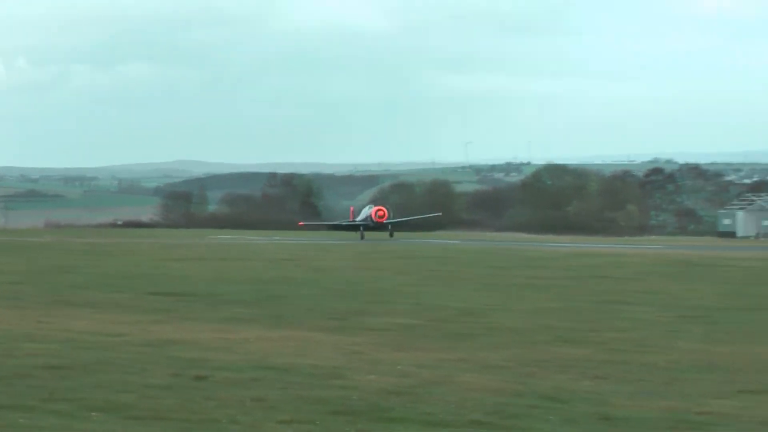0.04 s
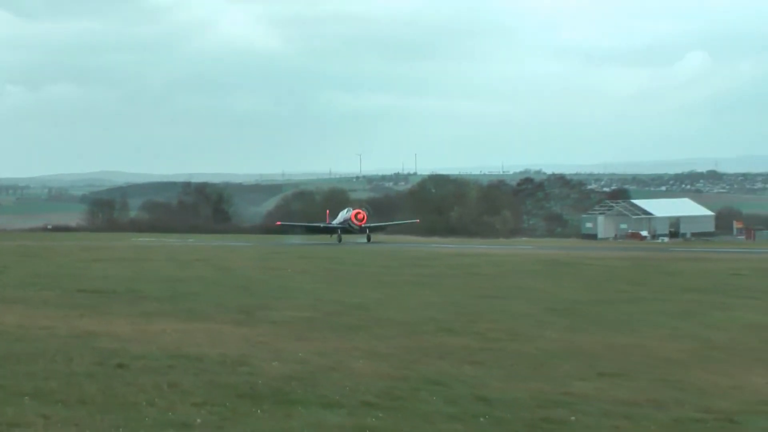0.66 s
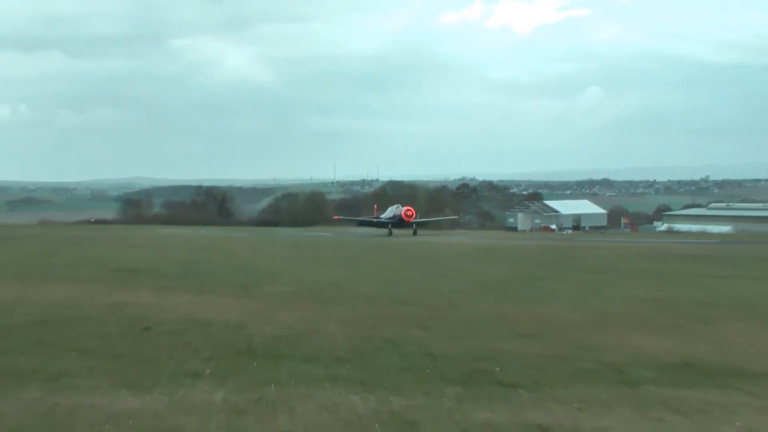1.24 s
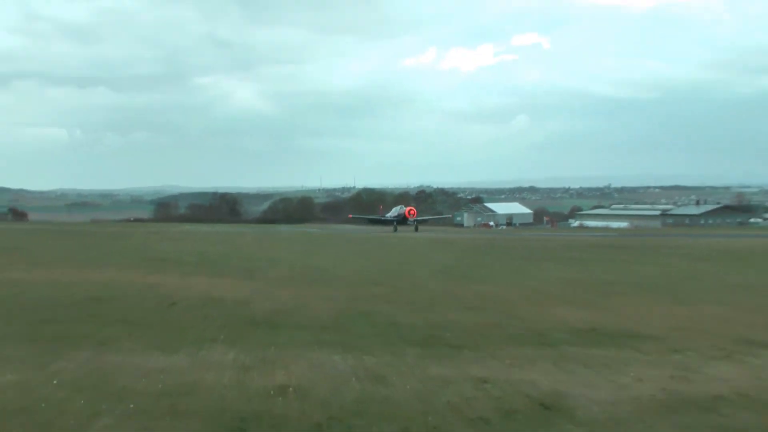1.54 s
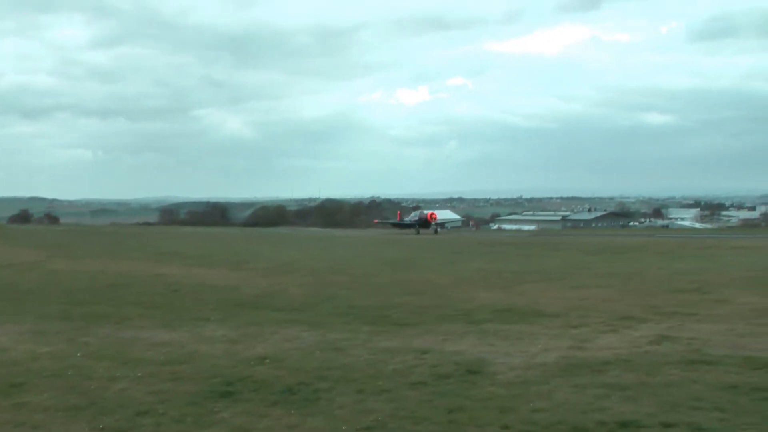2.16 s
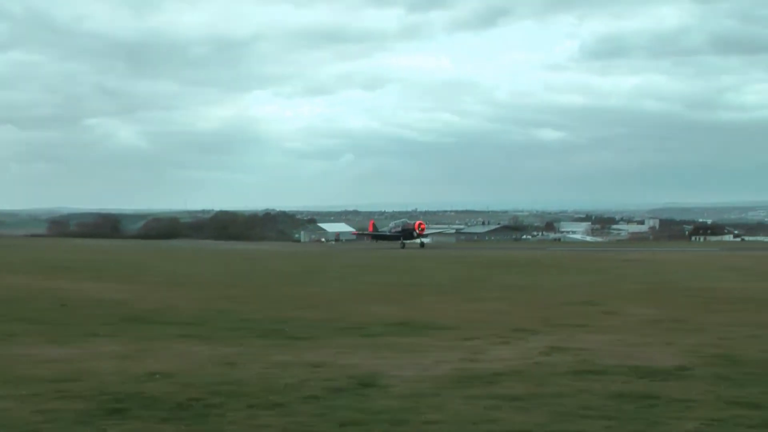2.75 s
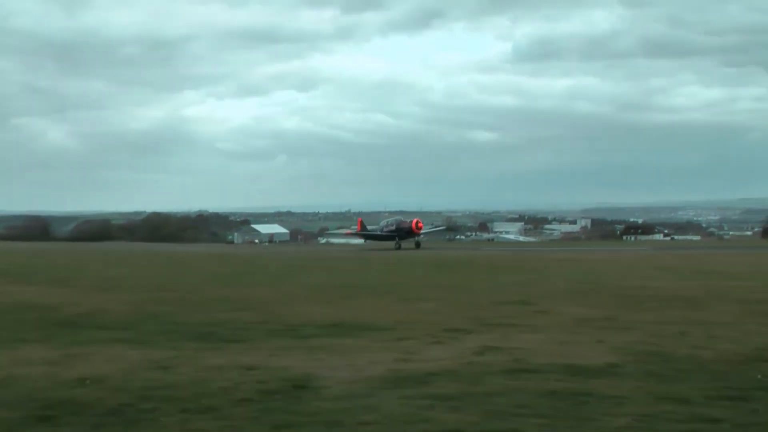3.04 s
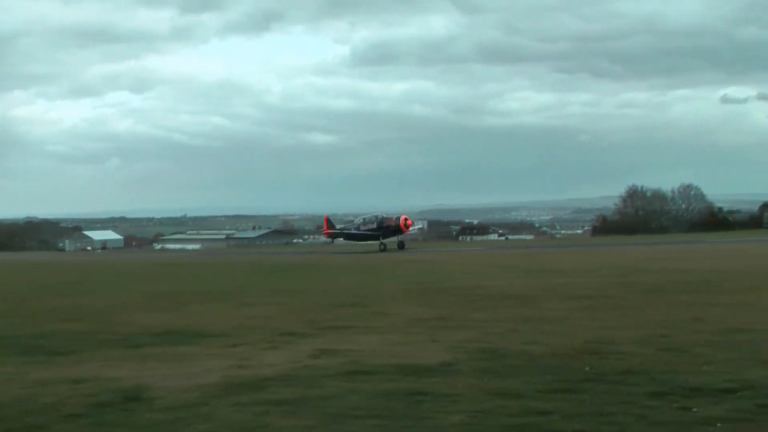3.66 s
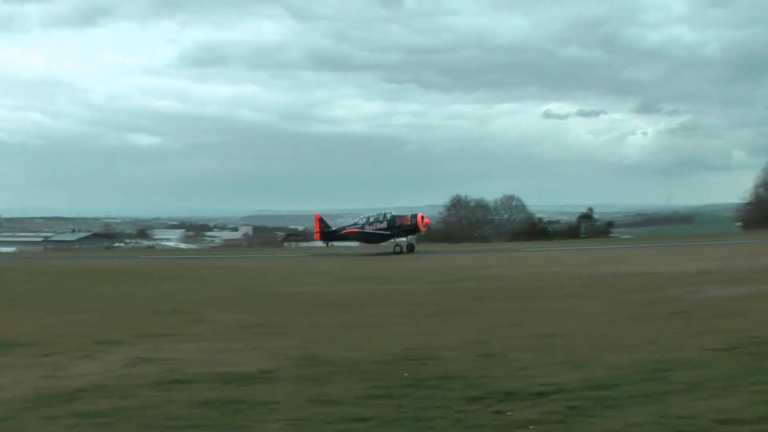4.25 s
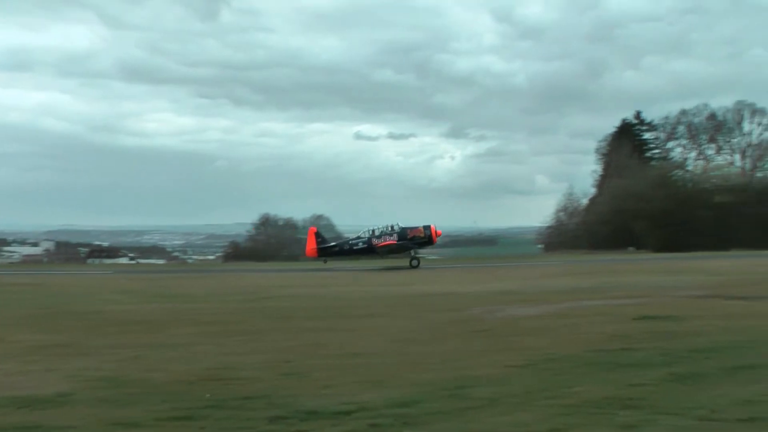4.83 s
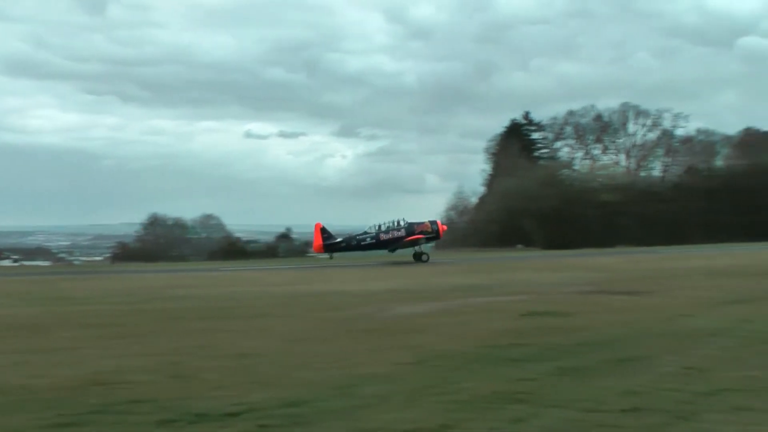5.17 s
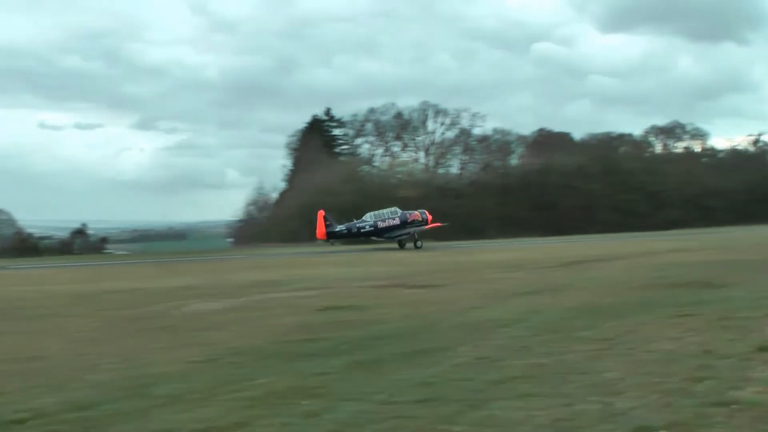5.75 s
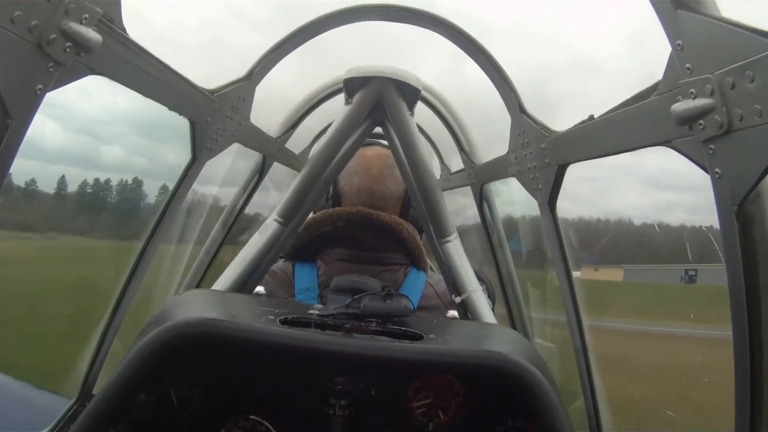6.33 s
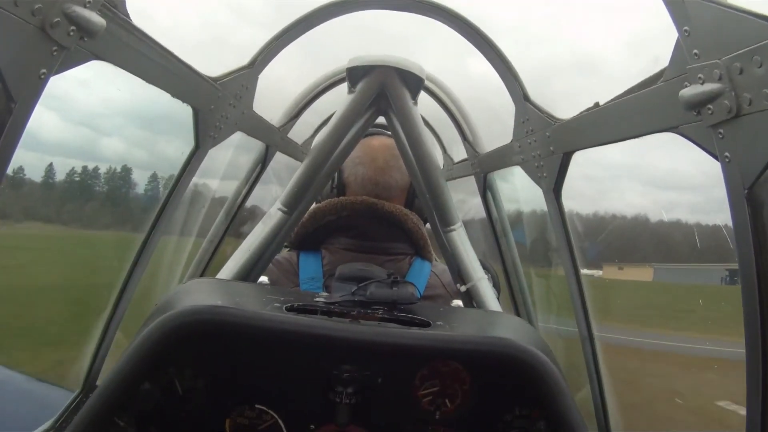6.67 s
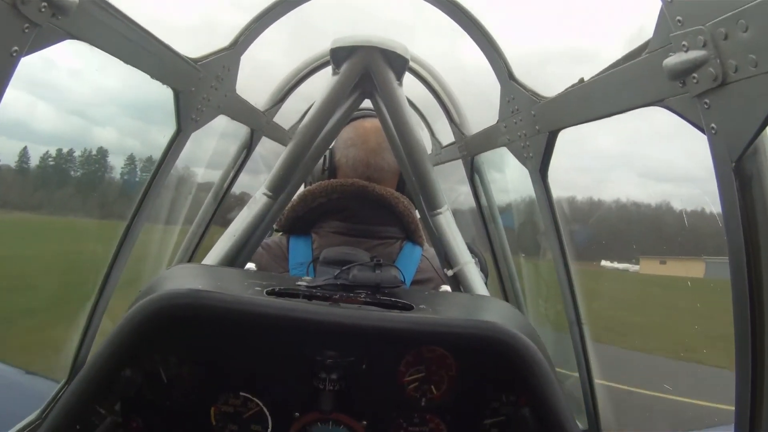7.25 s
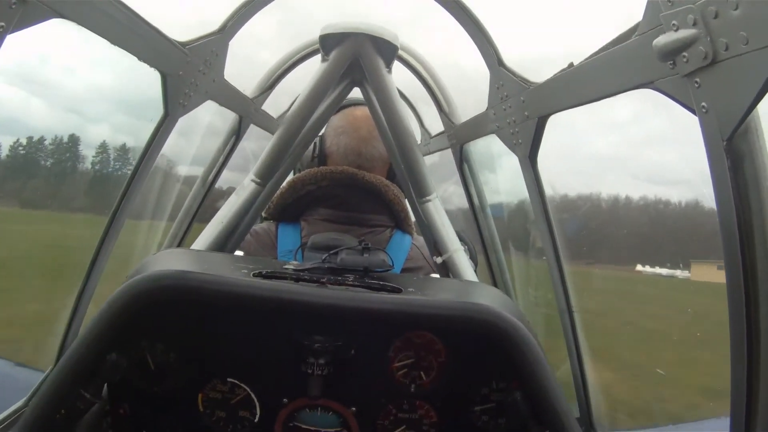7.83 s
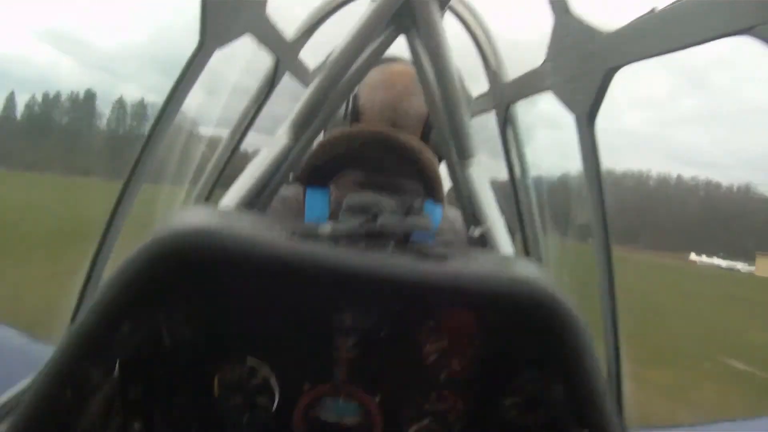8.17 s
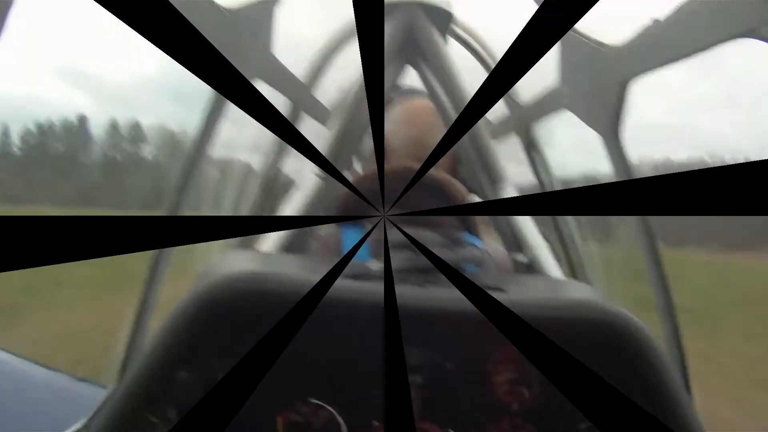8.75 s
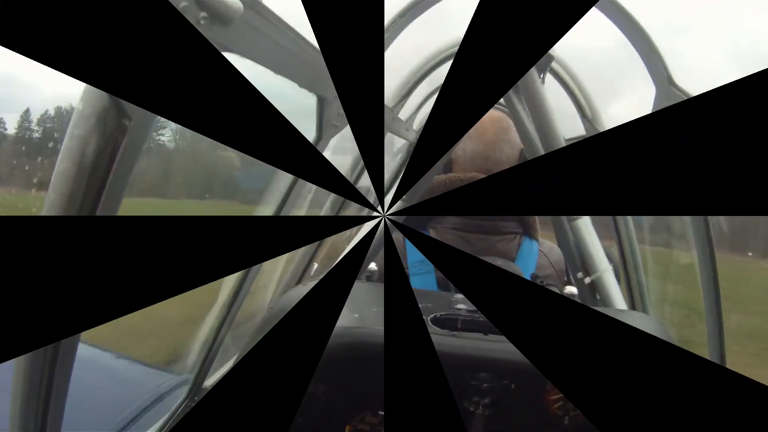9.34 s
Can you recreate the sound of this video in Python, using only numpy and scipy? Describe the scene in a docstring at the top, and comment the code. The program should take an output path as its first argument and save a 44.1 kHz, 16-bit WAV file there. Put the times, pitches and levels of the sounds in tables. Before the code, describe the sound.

A propeller plane's radial engine rumbles louder as it lands and rolls past with tyre chirps, then is heard from the rattling cockpit.

```python
"""Beside a runway, on two close microphones: a nine-cylinder radial aeroplane lands and rolls past,
throttled back and slowing all the while. Its unequal cylinders make the exhaust lope and burble, the
two-bladed propeller chops the rushing air, the tyres chirp; a distant bird calls once.
From about six seconds we listen from the cockpit: a fuller rumble, rattles, knocks and a thin whine.
The outside sound returns in the last half second."""
import sys
import numpy as np
from scipy import signal
from scipy.fft import rfft, irfft, next_fast_len
from scipy.io import wavfile
from scipy.ndimage import uniform_filter1d

SR = 44100
rng = np.random.default_rng(int(sys.argv[2]) if len(sys.argv) > 2 else 0)


def pcm_store(signal):
    """Save signal as 16-bit PCM."""
    levels = np.round(np.clip(np.atleast_2d(signal), -1, 1) * 32767)
    wavfile.write(sys.argv[1], SR, levels.astype(np.int16).T)


N = 418950
T = np.arange(N) / SR
CYLINDERS, BLADES = 9, 2
PASS_S = 5.4  # the plane draws level with the microphones


def firing_hz(start_hz=79.9, idle_hz=47.0, coast_s=7.2, doppler=0.027, pass_width_s=0.6):
    """Firings a second at the microphones: a coast towards idle, bent by the Doppler shift of the pass."""
    at_engine = idle_hz + (start_hz - idle_hz) * np.exp(-T / coast_s)
    return at_engine * (1 - doppler * np.tanh((T - PASS_S) / pass_width_s))


# Exhaust colour from beside the runway: (frequency [Hz], relative level [dB])
PIPE_COLOUR = [(15, -44), (32, -22), (50, -5), (75, -11), (95, -3.5), (120, -1), (145, 3), (200, -2),
               (240, -4), (300, -12.3), (380, -24.5), (520, -68), (900, -61)]
# Exhaust colour from the cockpit: (frequency [Hz], relative level [dB])
COCKPIT_COLOUR = [(18, -26), (32, -7), (42, -8), (55, 2.5), (80, -10.5), (125, 1), (170, -2.5), (210, 0),
                  (250, -6.5), (345, -11), (410, -18.5), (520, -28), (900, -47)]
def exhaust(cycles, cycle_hz, inside, beat_db=-1.5, burble_db=-5.0, uneven_db=1.0, throb_db=2.1):
    """Nine cylinders beat in a repeating pattern, and each firing lets out a dying puff of noise."""
    firings = CYLINDERS * cycles
    strength = gain_of(uneven_db * rng.standard_normal(2000))[firings.astype(int)]
    puffs = stereo_noise(-20) * strength * np.exp(-(firings % 1) / 0.98)
    burble = np.sqrt(1 - inside) * coloured(puffs, PIPE_COLOUR)
    burble += np.sqrt(inside) * coloured(puffs, COCKPIT_COLOUR)
    note = gain_of(beat_db) * cylinder_beat(cycles, cycle_hz, inside) + gain_of(burble_db) * burble
    span = int(0.072 * SR)  # even out the slow swells, keep the quick pulse
    power = uniform_filter1d(uniform_filter1d((note ** 2).mean(0), span), span)
    throb = np.cos(4 * np.pi * cycles)  # once a turn of the crank, two turns a cycle
    return gain_of(exhaust_db(inside) + throb_db * throb) * note / np.sqrt(power)


# Exhaust lines: (multiple of the four-stroke cycle, lift outside [dB], lift in the cockpit [dB])
ENGINE_ORDERS = [(9, 11, -2), (11, -3.5, 11), (14, -8, 6.5), (16, 1, -2), (17, -0.5, -3), (18, 1, -7),
                 (19, -1, 4.5), (20, -0.5, 11), (21, -8, -21), (22, -2, 2), (23, -5, 1.5), (24, -0.5, 4.5),
                 (25, 0.5, 3), (26, 1, 3.5), (27, -5.5, 9.5), (28, -1.5, 0), (29, 0, -2), (30, -7.5, 0),
                 (31, -2, 2), (32, -3.5, -3), (33, -13, 3.5), (35, -2, -2.5)]
def cylinder_beat(cycles, cycle_hz, inside, waver=0.31, main_order=20, main_lift_db=8.8):
    """Unequal cylinders make a row of wavering lines, at rms 1; the main one stands out side on."""
    # low tones need only every tenth sample
    t, hz, turns, cockpit, side_on = (c[::10] for c in (T, cycle_hz, cycles, inside, bump(PASS_S, 2.9)))
    knots = np.linspace(0, t[-1], 52)
    beat = np.zeros(len(t))
    for order, outside_db, cockpit_db in ENGINE_ORDERS:
        db = (1 - cockpit) * (outside_db + read_db(PIPE_COLOUR, order * hz))
        db += cockpit * (cockpit_db + read_db(COCKPIT_COLOUR, order * hz))
        db += (order == main_order) * main_lift_db * side_on * (1 - cockpit)
        drift, swell = (np.interp(t, knots, rng.standard_normal(len(knots))) for _ in range(2))
        phase = 2 * np.pi * (order * turns + rng.random()) + waver * drift
        beat += gain_of(db) * (1 + waver * swell) * np.sin(phase)
    return np.interp(T, t, beat / np.sqrt(uniform_filter1d(beat ** 2, SR // 20)))


# The throttled engine catches (+) or falters (-): (time [s], level change [dB])
ENGINE_CATCHES = [(.3, -1.5), (.56, -3.5), (.69, 1.5), (.92, 2.5), (1.2, -4.5), (2.038, 1), (2.8, 3),
                  (2.91, -6), (3.39, -1), (3.6, 3.5), (4.02, 1.5), (4.141, 0.5), (4.28, -5.5), (4.42, 1),
                  (4.5, -1.5), (4.63, 3), (4.73, -1.5), (5.09, 2), (5.19, 1), (5.25, -6), (5.42, 1),
                  (5.53, 1), (5.65, -2.5), (5.89, -3.5), (6.4, -3), (6.56, -3), (6.79, -5), (6.87, -5.5),
                  (7.18, -2.5), (7.37, -5), (7.84, 2.5), (7.96, -3.5), (8.17, 2), (8.29, -4.5),
                  (8.45, -2.5), (8.56, 1), (8.69, -3.5), (8.89, 1.5), (8.98, -1), (9.14, 2.5), (9.27, -4.5),
                  (9.35, -2), (9.47, 4)]
def exhaust_db(inside, near_db=-24.5, far_db=-11.5, ease_s=7.24, ease_db_per_s=1.4, surge_db=0.72):
    """The exhaust grows as the plane nears, catches and surges, then eases late in the roll."""
    position_db = far_db * far_off(2.16) - 0.5 * bump(PASS_S, 1) + 1.5 * inside
    eased_db = ease_db_per_s * np.maximum(T - ease_s, 0)
    catches_db = sum(db * bump(s, 0.032) for s, db in ENGINE_CATCHES)
    return near_db + position_db - eased_db + catches_db + surge_db * wander(20)


# Hard firings: (time [s], strength [dB])
HARD_FIRINGS = [(3.758, -9), (3.816, -11), (4.018, -16), (4.424, -10), (4.623, -14), (5.398, -7),
                (5.467, -5), (5.69, -5.5)]
def exhaust_pops(hz=150, t60_s=0.037, strike_s=0.0024):
    """Now and then one cylinder fires hard: a dull thump out of the pipe."""
    out, t = np.zeros(N), np.arange(SR // 10) / SR
    rise = (1 - np.exp(-t / strike_s)) ** 2
    thump = rise * gain_of(-60 * t / t60_s) * np.sin(2 * np.pi * hz * t)
    for s, db in HARD_FIRINGS:
        add(out, s, gain_of(db) * thump)
    return out


def engine_at_microphones(engine, bass_hz=85, bass_lost=0.44, lag_rad=0.1):
    """Head on the bass is thin, far off the top is dull; the left side is a little later and softer."""
    bass = signal.sosfiltfilt(signal.butter(2, bass_hz, fs=SR, output="sos"), engine)
    thinned = engine - bass_lost * far_off(4.7) * bass
    dulled = distant(thinned, edge_hz=290, fade_s=2.0)
    phase_shift = np.exp(1j * lag_rad * np.array([[-1], [1]]))
    shifted = (signal.hilbert(dulled, next_fast_len(N))[:, :N] * phase_shift).real
    return shifted * lean_right(0.22 + 0.25 * cockpit_share())


# Four bands of rushing air, low to high, each: (frequency [Hz], relative level [dB])
ROAR_COLOUR = [(150, -28), (400, 2.5), (520, -1.5), (720, 3), (1050, 0.5), (1400, -0.5), (2500, -38)]
RASP_COLOUR = [(600, -26), (1000, -12), (1250, -5.5), (1480, -2), (1900, -2.5), (2350, -4.5), (2750, -4),
               (3300, -9), (4500, -39)]
HISS_COLOUR = [(1800, -63), (2900, -6), (3500, -3), (4150, 3.5), (4550, 1), (4950, -0.5), (5700, 0),
               (6800, -8), (8300, -19.5), (11000, -32.5)]
SIZZLE_COLOUR = [(6500, 3), (8500, -8.5), (10000, -3), (11500, -7), (13000, -8), (15500, -14)]
def propeller_air(cycles, inside, chop_db=1.24, uneven=0.47, canopy_db=2.5, drift_db=0.82):
    """Each blade chops the rushing air, most deeply head on and side on."""
    roar_db, rasp_db, hiss_db, sizzle_db = slipstream_db(inside)
    side_on = bump(5.57, 1.85)
    blade_passes = 2 * BLADES * cycles
    blade = np.cos(2 * np.pi * blade_passes)
    bite = 1 + uneven * rng.standard_normal(2000)[(blade_passes + 0.5).astype(int)]  # no two alike
    depth_db = chop_db + 1.5 * side_on + 1.5 * far_off(0.43)
    flutter_db = depth_db * np.where(blade > 0, bite * blade, blade)
    flutter_db += 0.77 * (1 + 0.5 * side_on) * wander(35)  # small gusts
    flutter_db += 1.2 * wander(500)  # fine grain
    crackle = blade_crackle(blade) * np.sqrt(side_on) * (1 - inside)
    roar = coloured(stereo_noise(-12), ROAR_COLOUR)
    roar *= gain_of(roar_db + 0.76 * flutter_db + drift_db * wander(60))
    head_on_chop_db = 0.9 * far_off(3.5) * blade
    rasp = coloured(stereo_noise(-16), RASP_COLOUR)
    rasp *= gain_of(rasp_db + 0.56 * flutter_db + head_on_chop_db + drift_db * wander(60))
    hiss = coloured(stereo_noise(-14) + 1.8 * crackle, HISS_COLOUR)
    hiss *= gain_of(hiss_db - canopy_db * inside + flutter_db + drift_db * wander(60))
    hiss = distant(hiss, edge_hz=6200, fade_s=1.86)
    sizzle = coloured(stereo_noise(-32) + 7 * crackle, SIZZLE_COLOUR)
    sizzle *= gain_of(sizzle_db + (0.96 - 0.13 * inside) * flutter_db)
    return (roar + rasp) * lean_right(0.9) + hiss * lean_right(0.6) + sizzle


def blade_crackle(blade, peak_per_s=400, spread_db=2.5):
    """The blades throw sharp crackles, thickest at the crest of each pass."""
    hits = rng.random(N) < peak_per_s / SR * np.maximum(blade, 0)
    return hits * gain_of(spread_db * np.minimum(rng.exponential(1, N), 3))


# The rush of air that rasp, hiss and sizzle follow: (time [s], level [dB])
AIR_RUSH = [(0, -56), (1.0, -53.4), (1.5, -49.5), (2.2, -46.5), (2.9, -49), (4.05, -45.5), (4.8, -50),
            (5.7, -52.5), (6.2, -49), (6.95, -51.5), (7.35, -49.5), (8.3, -52.5), (9.5, -56.5)]
# Slipstream gusts: (time [s], half length [s], roar change [dB], rasp change [dB], hiss change [dB])
SLIPSTREAM_GUSTS = [(2.883, 0.24, 3, 6.5, 4), (3.34, 0.17, 1, 4, 3.5), (3.844, 0.16, 2.5, 3.5, 2),
                    (4.568, 0.061, 2.5, 2, 2), (5.3, 0.073, 2, 5, 3), (5.945, 0.055, 0.5, 1.5, 2.5),
                    (6.18, 0.07, 1, -1.5, 1), (7.217, 0.052, 2, 0.5, 3), (8.392, 0.055, 7, 1, 1.5),
                    (8.513, 0.045, 4.5, 1.5, 3.5)]
def slipstream_db(inside, wash_db=-46, slowing_s=5.55, slowing_db_per_s=2.0, microphone_hiss_db=-75):
    """Levels of roar, rasp, hiss and sizzle as the plane nears, passes and slows through the gusts."""
    rush = curves(AIR_RUSH)[0]
    gusts = sum(np.outer(dbs, bump(s, half_s)) for s, half_s, *dbs in SLIPSTREAM_GUSTS)
    roar_gust, rasp_gust, hiss_gust = gusts
    roar = wash_db - 11 * far_off(1.9) - slowing_db_per_s * np.maximum(T - slowing_s, 0)
    rasp = rush + 1.34 + 4.5 * far_off(2.83)  # thrown forward, so stronger on the approach
    nearness_db = -10.5 * far_off(2.6) + 4.5 * bump(PASS_S, 1) + 6.5 * inside
    sizzle = rush - 17.5 + nearness_db + 1.5 * hiss_gust  # carries only a short way
    return roar + roar_gust, rasp + rasp_gust, rush + hiss_gust, np.maximum(sizzle, microphone_hiss_db)


# Spits as the propeller passes close by: (time [s], level [dB])
BLADE_SPITS = [(3.394, -41), (3.788, -37.5), (3.859, -43), (3.887, -44), (3.921, -42), (3.992, -42),
               (4.188, -41), (4.365, -43), (4.526, -37.5), (4.56, -42), (4.596, -41), (4.62, -41),
               (5.192, -44), (5.267, -42), (5.279, -44), (5.299, -46), (5.462, -48)]
def blade_spits(rise_s=0.0032, grain_db=1.0, fizz_db=-15):
    """The hardest bites of the blades: short, grainy bursts of hiss with a fizzing top."""
    level, age = np.zeros(N), np.arange(SR // 20) / SR / rise_s
    for s, db in BLADE_SPITS:
        add(level, s, gain_of(db) * age * np.exp(1 - age))
    grains = stereo_noise(-16) * gain_of(grain_db * wander(2500))
    return level * (coloured(grains, HISS_COLOUR) + gain_of(fizz_db) * coloured(grains, SIZZLE_COLOUR))


# Squeaks on the runway: (time [s], level [dB], pitch [Hz], length [s], glide [octaves], roughness [0-1])
TYRE_CHIRPS = [(0.619, -43, 1600, 0.061, -0.24, 0.46), (0.927, -37, 1650, 0.029, .15, 0.44),
               (1.459, -37.5, 1440, 0.04, -0.2, 0.3), (2.394, -39, 1690, 0.035, -0.0062, 0.5),
               (2.937, -35, 1260, 0.027, -0.17, 0.6), (3.272, -38, 863, 0.024, -0.018, 0.8),
               (4.805, -24.5, 1548, 0.029, -0.06, 0.18), (4.822, -34, 1407, 0.038, -0.17, 0.36),
               (5.263, -35, 1554, 0.035, -0.16, 0.38), (5.244, -39, 1955, 0.068, 0.0099, 0.77),
               (5.469, -43, 1200, 0.037, -0.12, 0.5), (6.308, -41.5, 1253, 0.018, 0, 0.95),
               (6.433, -43.5, 2044, 0.021, 0.043, 0.6), (6.547, -39, 1680, 0.013, 0.11, 0.8)]
def tyres(scatter=0.15):
    """Rubber sticks and slips: short gliding squeals whose pitch scatters when they are rough."""
    out = np.zeros(N)
    for s, db, hz, length_s, glide, rough in TYRE_CHIRPS:
        size = round(length_s * SR)
        pitch = hz * 2 ** (glide * np.linspace(-0.5, 0.5, size))
        pitch *= 1 + scatter * rough * wander(933, size)
        squeal = np.sin(2 * np.pi * np.cumsum(pitch) / SR) * (1 + rough * wander(527, size))
        add(out, s, gain_of(db) * unit_rms(squeal) * signal.windows.tukey(size, 0.6))
    return out


# Whirr of the roll: (time [s], pitch [Hz], level [dB])
ROLL_WHIRR = [(0, 1603, -62), (1.5, 1488, -52), (3, 1366, -44.5), (4.4, 1409, -49.5), (5, 1479, -48),
              (5.6, 1320, -52), (6.5, 1307, -48.5), (6.9, 1250, -62), (9.5, 1246, -75)]
def rolling_whirr(width_hz=560):
    """A fuzzy band that sinks as the plane slows."""
    hz, db = curves(ROLL_WHIRR)
    return gain_of(db) * noise_band(hz, width_hz)


# Knocks heard from the cockpit: (time [s], strength [dB])
FRAME_KNOCKS = [(8.2202, -22), (8.374, -43), (8.419, -37.5)]
# Airframe modes: (frequency [Hz], relative level [dB], t60 [s])
FRAME_MODES = [(340, 4.5, 0.092), (405, -11, 0.19), (720, -12, 0.028), (1274, -7, 0.047),
               (1450, -5.5, 0.035), (1830, -5, 0.037), (2280, -24, 0.021), (2830, -12, 0.041)]
# Loose cockpit fittings: (time [s], level [dB], pitch [Hz], width [Hz], t60 [s])
FITTING_TICKS = [(6.975, -36, 4080, 300, 0.074), (7.599, -32, 4470, 2400, 0.07),
                 (7.758, -30.5, 5050, 2400, 0.034), (7.829, -39, 4400, 2000, .04),
                 (8.077, -35, 3840, 2210, 0.05), (8.398, -41, 4400, 1500, .04),
                 (8.5623, -35, 4070, 400, 0.066), (8.6213, -42, 4300, 403, .07),
                 (9.052, -44, 4200, 700, .06)]
def airframe(strike_s=0.0009):
    """Knocks ring the airframe, and loose fittings tick, some dry, some ringing."""
    out, t = np.zeros(N), np.arange(SR // 4) / SR
    rise = 1 - np.exp(-t / strike_s)
    ring = sum(gain_of(db - 60 * t / t60) * np.sin(2 * np.pi * hz * t) for hz, db, t60 in FRAME_MODES)
    for s, db in FRAME_KNOCKS:
        add(out, s, gain_of(db) * rise * ring)
    for s, db, hz, width_hz, t60 in FITTING_TICKS:
        tick = np.sin(2 * np.pi * hz * t) * wander(width_hz, len(t))
        add(out, s, gain_of(db - 60 * t / t60) * rise * tick)
    return out


# Faint double clicks close to the microphones: (time [s], level before filtering [dB])
CATCH_CLICKS = [(.682, -45), (.792, -43.5), (1.911, -46), (2.023, -44), (3.219, -45), (5.874, -40),
                (9.098, -54)]
def small_catch(t60_s=0.019, rebound_s=0.017, rebound_db=-6, tail_db=-24, tail_t60_s=0.5):
    """A small catch clicks, rebounds and rings on faintly, high in the treble."""
    out, t = np.zeros(N), np.arange(SR // 4) / SR
    decay = gain_of(-60 * t / t60_s) + gain_of(tail_db - 60 * t / tail_t60_s)
    for s, db in CATCH_CLICKS:
        add(out, s, gain_of(db) * decay * rng.standard_normal(len(t)))
        add(out, s + rebound_s, gain_of(db + rebound_db) * decay * rng.standard_normal(len(t)))
    return signal.sosfilt(signal.butter(3, [8500, 14500], "band", fs=SR, output="sos"), out)


# Something small jingling, from fully inside the cockpit: (time [s], level [dB])
METAL_JINGLE = [(5.88, -83), (5.95, -61), (6.15, -49.5), (6.45, -54.5), (6.65, -60), (7.1, -72),
                (7.3, -52.5), (7.8, -63), (8.3, -80)]
def loose_metal(cycles, hz=5500, width_hz=1800, shake_db=3.5):
    """Loose metal, shaken by each firing, buzzes in one broad high band."""
    shake = np.cos(2 * np.pi * CYLINDERS * cycles)
    level = gain_of(curves(METAL_JINGLE)[0] + shake_db * shake)
    return level * (T > METAL_JINGLE[0][0]) * noise_band(hz, width_hz)


# Whine inside the cockpit: (pitch [Hz], width [Hz], level [dB])
WHINE_TONES = [(9302, 35, -78), (11795, 25, -79.5), (11860, 260, -72), (12205, 22, -84),
               (12100, 260, -70.5), (14694, 18, -87.5)]
def cockpit_whine(inside, fade_s=8.7, fade_db_per_s=10):
    """A few thin, fuzzy, very high tones that fade late in the roll."""
    tones = sum(gain_of(db) * noise_band(hz, width_hz) for hz, width_hz, db in WHINE_TONES)
    fade_db = -fade_db_per_s * np.maximum(T - fade_s, 0)
    return np.minimum(2 * inside, 1) * gain_of(fade_db) * tones


# A bird, far from the microphones: (time [s], pitch [Hz], level [dB])
BIRD_CALL = [(.655, 6020, -70), (.72, 5810, -59), (.76, 5630, -60), (.805, 5400, -55)]
def bird(ragged=0.9, flutter_per_s=450):
    """One thin, ragged, falling whistle."""
    hz, db = curves(BIRD_CALL)
    calling = (T > BIRD_CALL[0][0]) & (T < BIRD_CALL[-1][0])
    level = gain_of(db) * calling * (0.93 + ragged * wander(flutter_per_s))
    return level * np.sin(2 * np.pi * np.cumsum(hz) / SR)


# Listening position: (time [s], share heard from the cockpit [0-1])
COCKPIT_SHARE = [(5.84, 0.02), (5.94, 0.4), (6.3, 0.95), (8.6, 0.89), (9.1, 0.68), (9.25, 0.3), (9.5, 0.16)]
def cockpit_share():
    """0 beside the runway, 1 in the cockpit."""
    return curves(COCKPIT_SHARE)[0]


def distant(x, edge_hz, fade_s):
    """While the plane is far off, the top of its sound is lost on the way."""
    dull = signal.sosfiltfilt(signal.butter(3, edge_hz, fs=SR, output="sos"), x)
    return x + far_off(fade_s) * (dull - x)


def far_off(fade_s):
    """1 while the plane is distant, falling towards 0 as it arrives."""
    return bump(0, fade_s)


def bump(s, half_s):
    """A smooth swell that reaches 1 at time s."""
    return np.exp(-((T - s) / half_s) ** 2)


def wander(per_s, size=N):
    """A random drift of rms near 1, with so many new values a second."""
    at = np.arange(size) * per_s / SR
    return 1.2 * np.interp(at, np.arange(32768), rng.standard_normal(32768))


def noise_band(hz, width_hz):
    """A tone smeared into a band of noise."""
    phase = 2 * np.pi * np.cumsum(hz * np.ones(N)) / SR
    return wander(width_hz) * np.cos(phase) + wander(width_hz) * np.sin(phase)


def stereo_noise(side_db):
    """White noise at two close microphones: mostly alike."""
    mid, side = rng.standard_normal((2, N))
    return mid + gain_of(side_db) * np.array([side, -side])


def lean_right(db):
    """Stereo gains: left down and right up by db."""
    return gain_of(np.outer([-1, 1], db))


def coloured(x, colour):
    """Filters x by a colour table, at rms 1."""
    size = next_fast_len(N)
    response = gain_of(read_db(colour, np.fft.rfftfreq(size, 1 / SR)))
    return unit_rms(irfft(rfft(x, size) * response, size)[..., :N])


def read_db(colour, hz):
    """A colour's level at any frequency, falling away beyond its ends."""
    knot_hz, db = np.transpose(colour)
    at, knots = np.log(hz + 1), np.log(knot_hz + 1)
    beyond = abs(at - np.clip(at, knots[0], knots[-1]))
    return np.interp(at, knots, db) - 40 * beyond


def curves(rows):
    """Each column of a timed table, one value a sample."""
    s, *columns = np.transpose(rows)
    return [np.interp(T, s, c) for c in columns]


def add(mix, s, sound):
    """Mixes a sound in at time s."""
    part = mix[round(s * SR):][:len(sound)]
    part += sound[:len(part)]


def gain_of(db):
    """Decibels to amplitude."""
    return 10 ** (np.asarray(db) / 20)


def unit_rms(x):
    """Scales to rms 1."""
    return x / np.sqrt(np.mean(x ** 2) + 1e-20)


def scene():
    """One engine speed drives exhaust, propeller and jingle; the rest sounds around them."""
    cycle_hz = firing_hz() / CYLINDERS
    cycles = np.cumsum(cycle_hz) / SR  # four-stroke cycles so far
    inside = cockpit_share()
    engine = engine_at_microphones(exhaust(cycles, cycle_hz, inside) + exhaust_pops())
    wheels = (tyres() + rolling_whirr()) * lean_right(0.5)
    propeller = propeller_air(cycles, inside) + blade_spits()
    fittings = airframe() + small_catch()
    cockpit = cockpit_whine(inside) + inside * loose_metal(cycles)
    return engine + propeller + wheels + fittings + cockpit + bird()


def record(dry, edge_hz=15600):
    """The recorder's band limit."""
    lowpass = signal.firwin(511, edge_hz, window=("kaiser", 9), fs=SR)
    return signal.oaconvolve(dry, lowpass[None], "same")


dry = scene()
out = record(dry)
pcm_store(out)
```